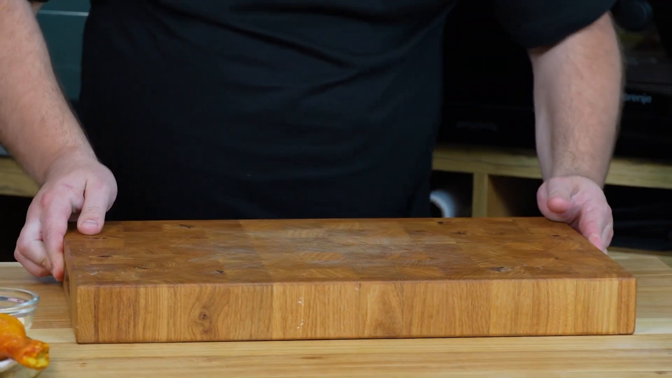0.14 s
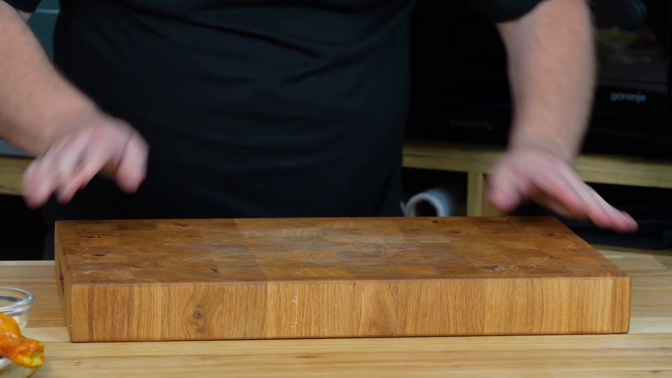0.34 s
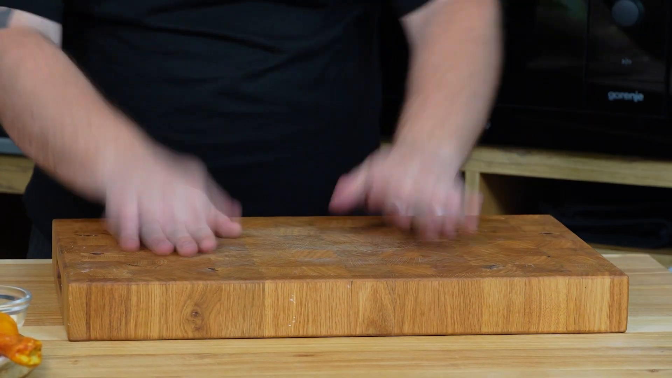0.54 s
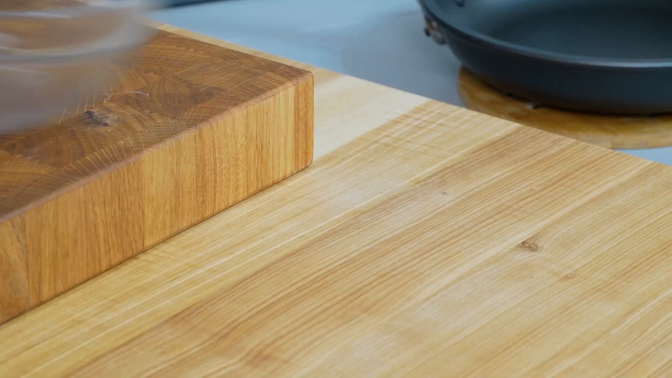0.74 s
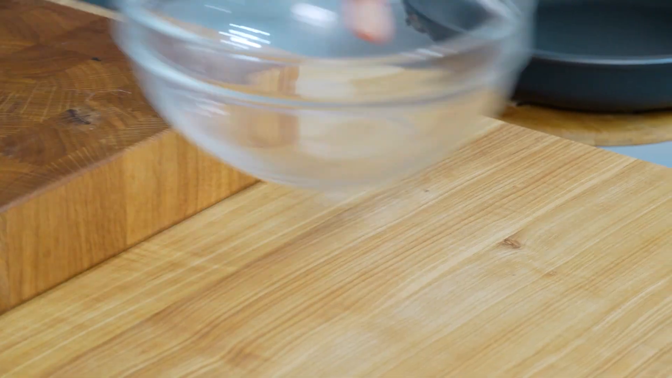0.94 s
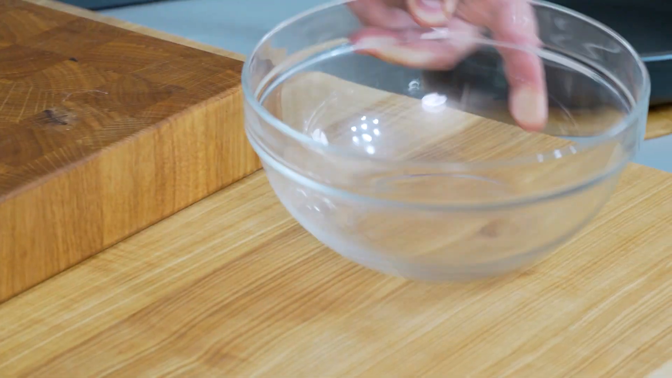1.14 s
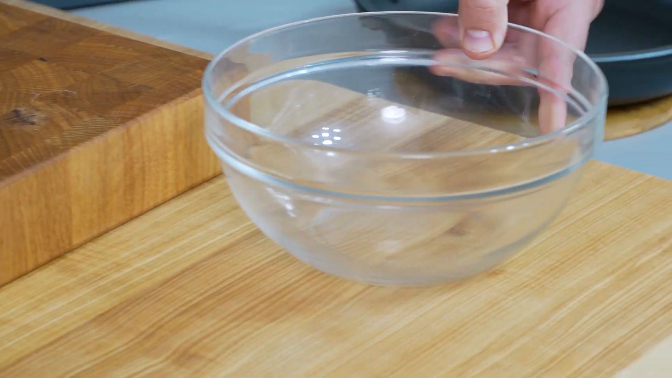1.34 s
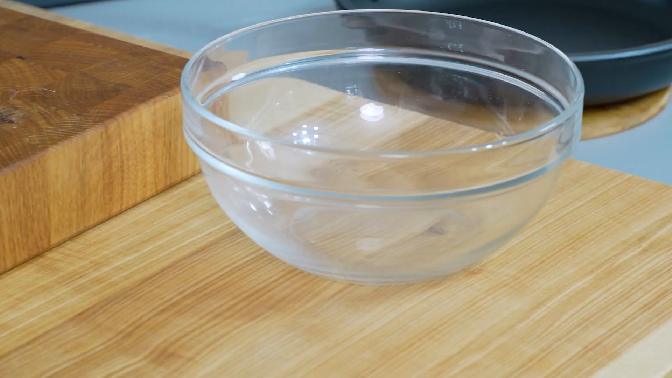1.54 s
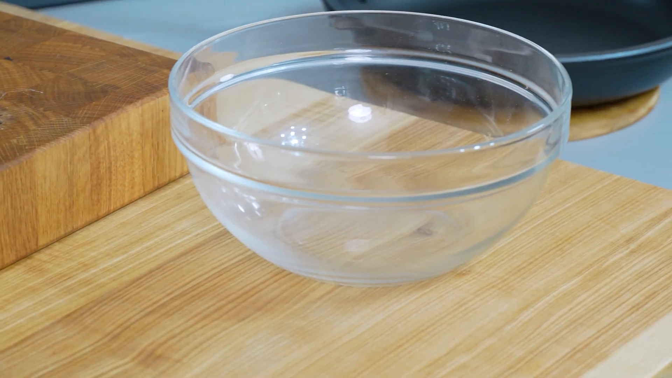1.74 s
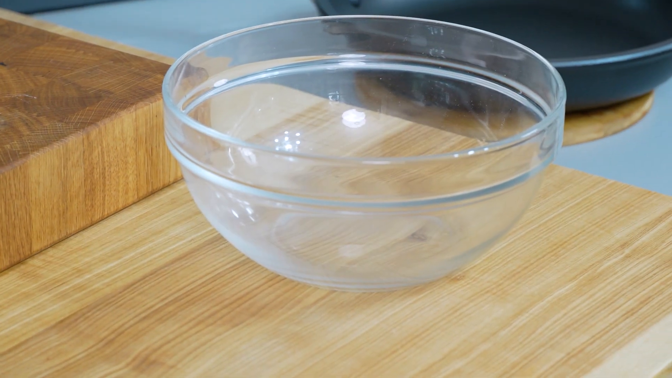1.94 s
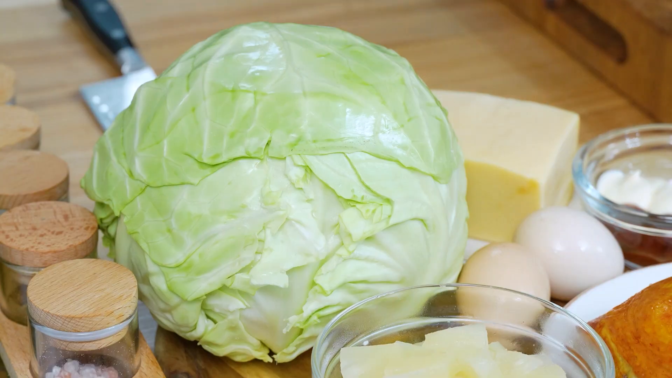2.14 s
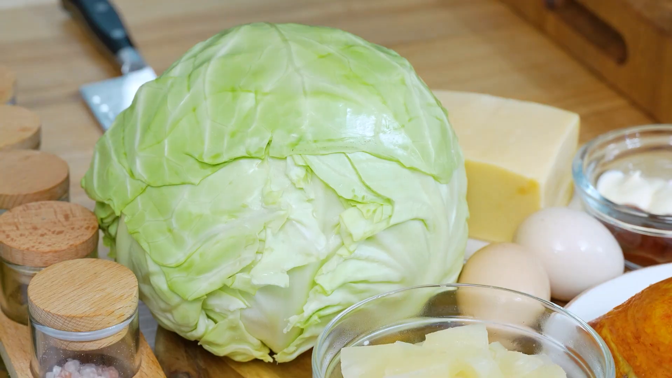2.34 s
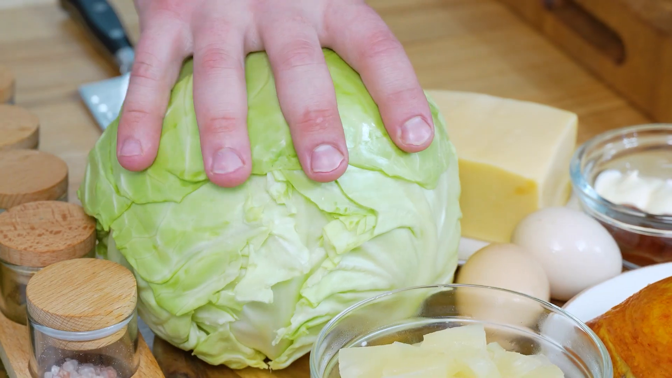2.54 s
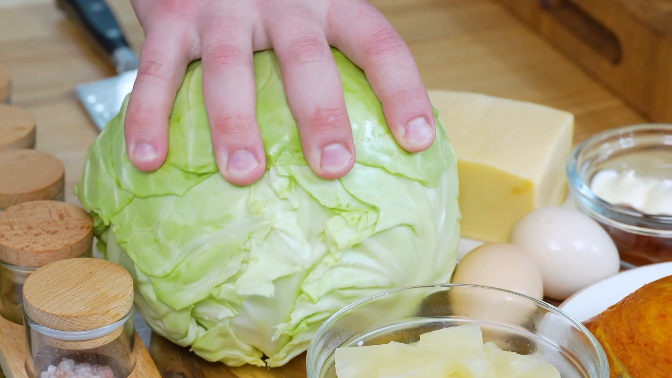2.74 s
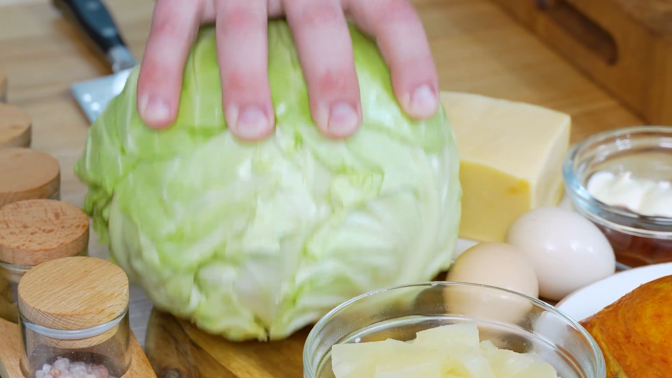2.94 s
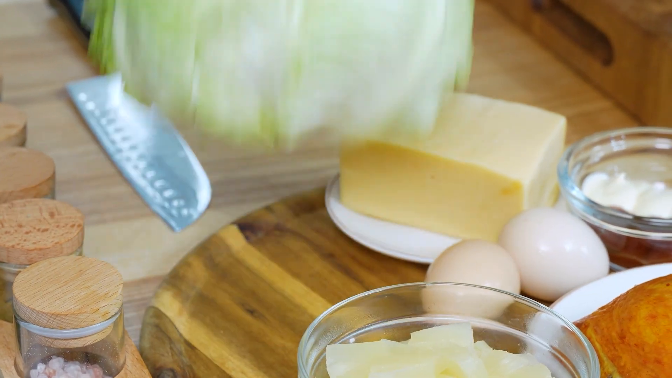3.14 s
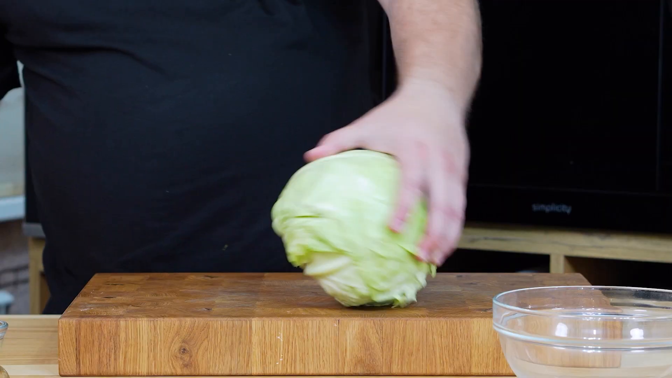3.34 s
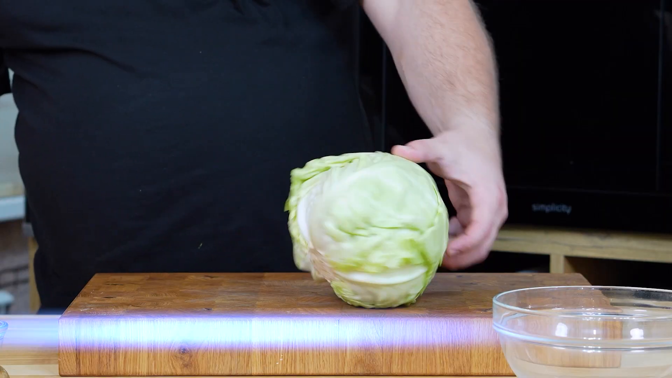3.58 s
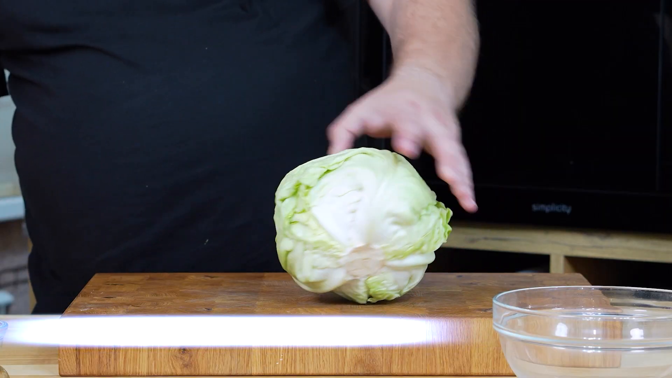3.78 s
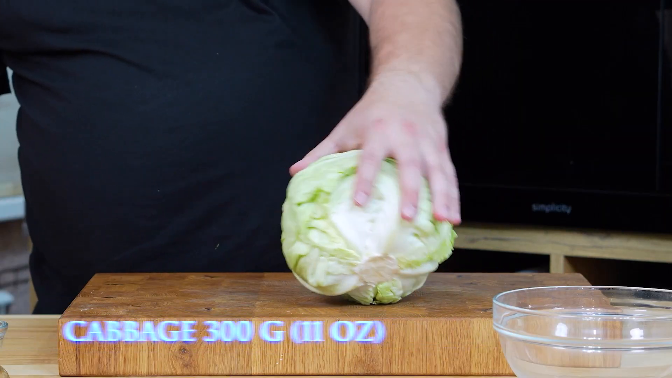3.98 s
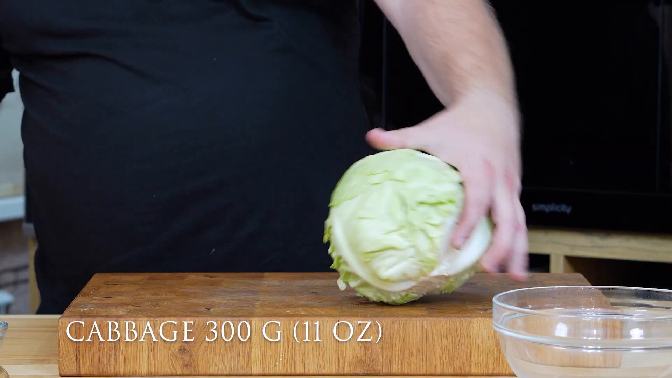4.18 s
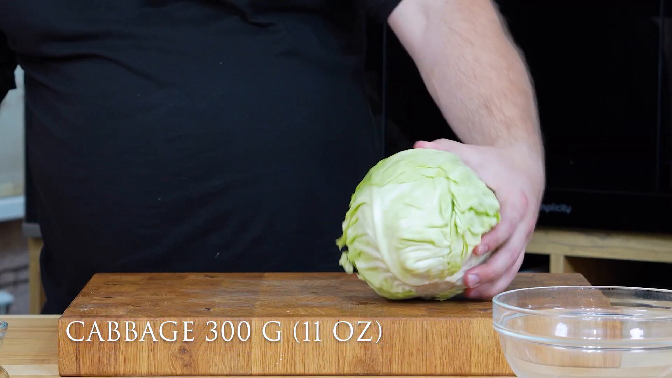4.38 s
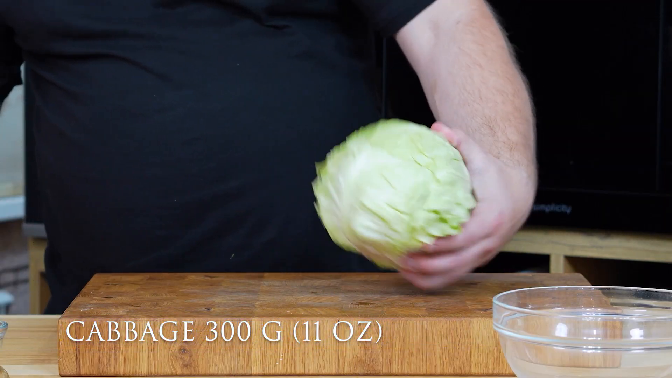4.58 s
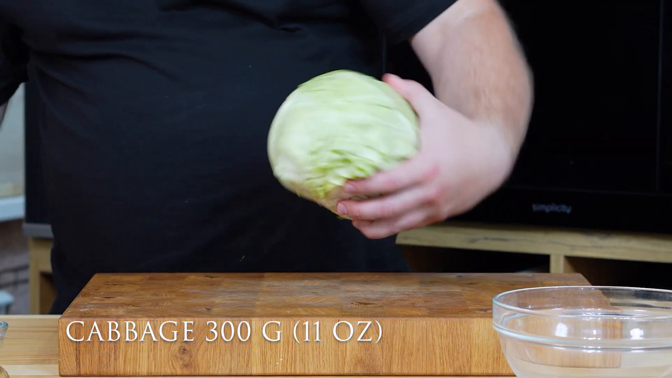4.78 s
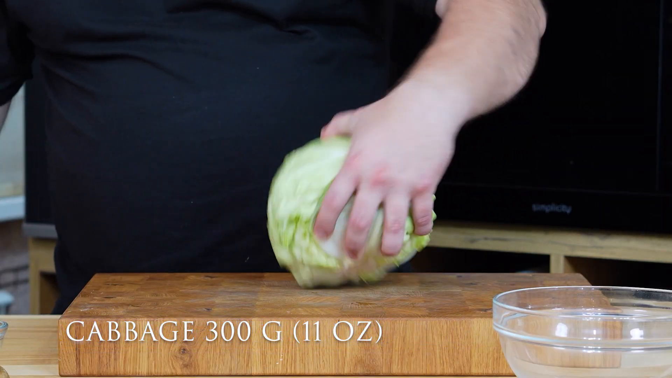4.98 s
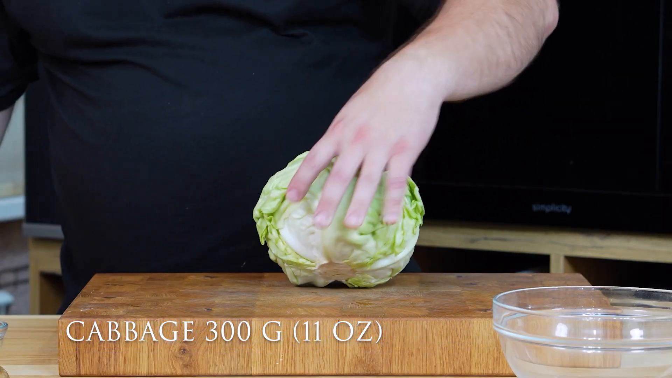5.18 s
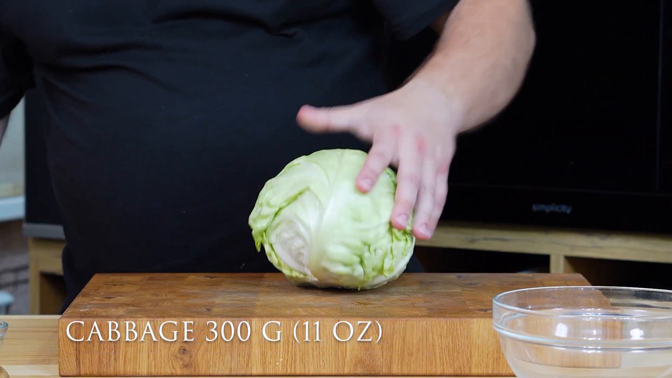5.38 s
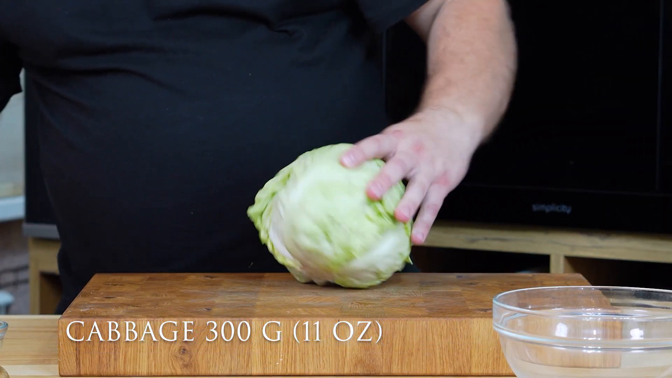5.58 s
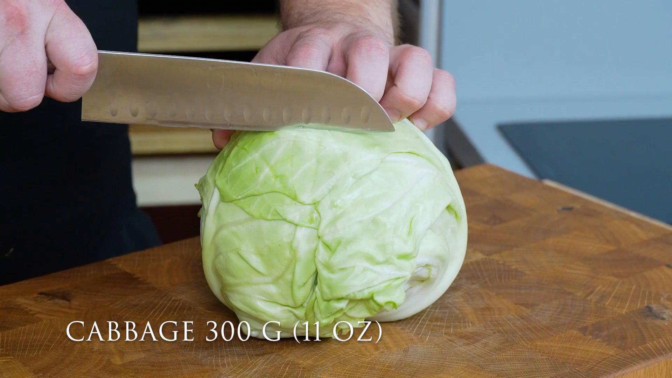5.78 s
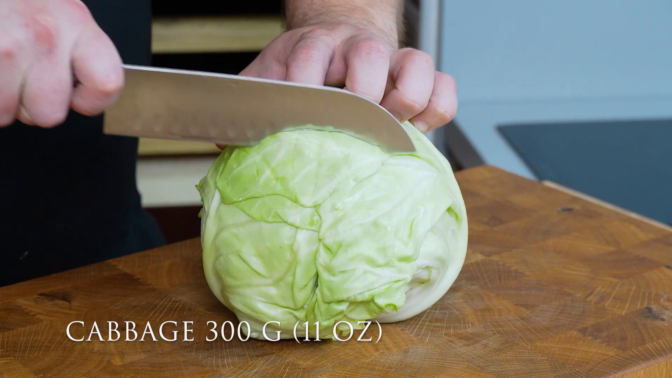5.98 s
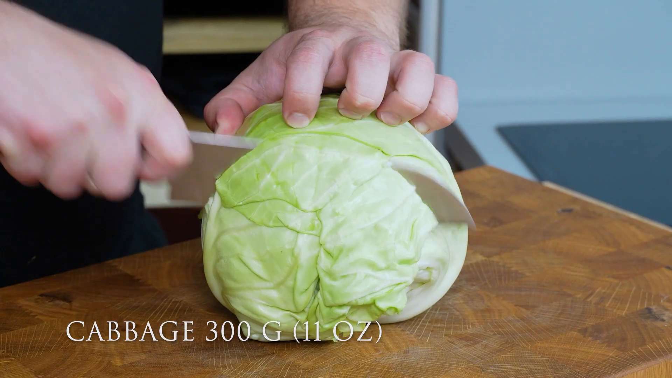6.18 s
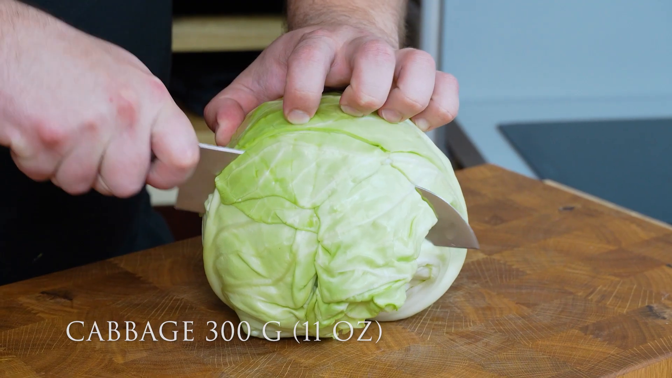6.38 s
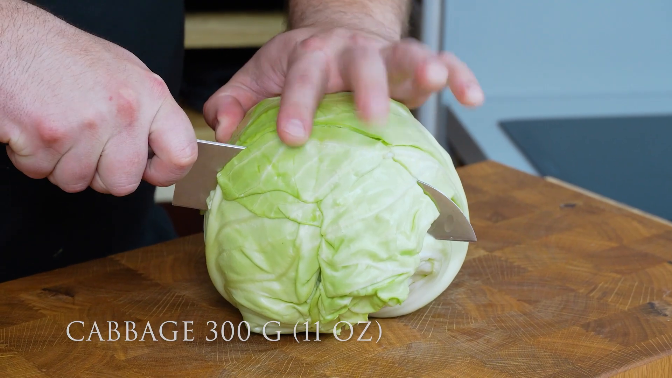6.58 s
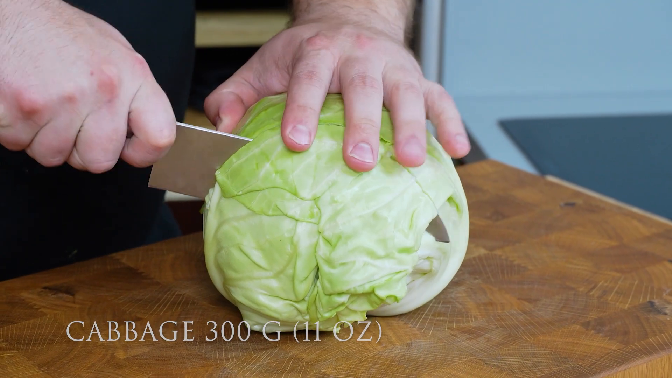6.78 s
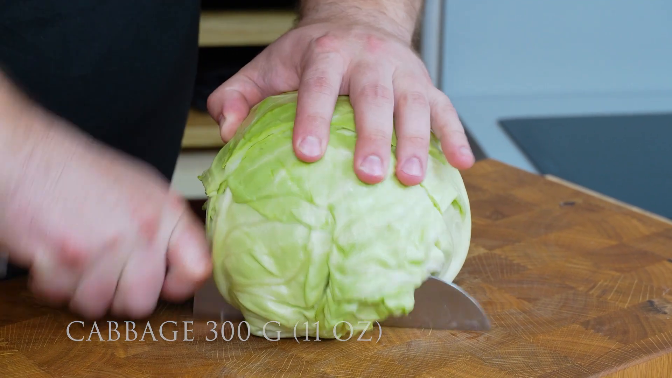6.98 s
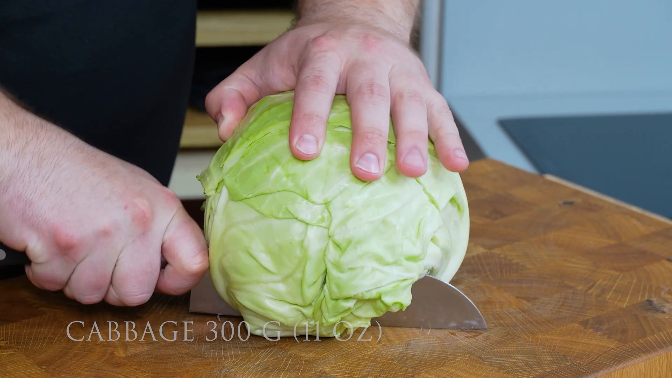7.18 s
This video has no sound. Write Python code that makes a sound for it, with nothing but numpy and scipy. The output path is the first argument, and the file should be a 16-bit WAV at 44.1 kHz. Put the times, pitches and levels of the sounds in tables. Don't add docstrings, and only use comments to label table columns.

```python
import sys
import numpy as np
from scipy import signal
from scipy.fft import rfft, irfft, next_fast_len
from scipy.io import wavfile
from scipy.ndimage import uniform_filter1d

SR = 44100
rng = np.random.default_rng(int(sys.argv[2]) if len(sys.argv) > 2 else 0)


def transcribe(signal):
    frames = np.atleast_2d(signal).T
    limited = np.clip(frames, -1, 1)
    pcm = np.round(limited * 32767).astype(np.int16)
    wavfile.write(sys.argv[1], SR, pcm)


def gain_from_db(level_db):
    decades = np.asarray(level_db, float) / 20
    return 10 ** decades


N = 318843

# t/s, peak level/dB, tilt towards the upper modes/(dB per octave)
JOLTS = [(0.144, -28, -6), (0.618, -25, 18), (0.868, -59, -4), (1.219, -45.5, 0), (1.678, -58.5, 2.5),
         (2.509, -32.5, -5), (2.539, -40.5, -14), (3.361, -72, -14), (3.635, -48.5, -17), (3.931, -64, -10),
         (5.085, -25, -4), (5.501, -58, -2), (6.282, -53, -5), (6.643, -56.5, 16.5), (7.007, -45, 7)]
# t/s, peak level/dB, f/Hz
THUDS = [(0.045, -39.5, 164), (1.549, -40, 310), (1.681, -49.5, 225.6), (3.399, -36, 337),
         (3.403, -43.5, 460), (3.641, -52, 158), (3.93, -56.5, 177), (4.518, -54.5, 164),
         (5.081, -39.5, 565), (5.506, -46, 540), (6.399, -49.5, 697), (7.014, -28, 282), (7.089, -36, 170)]
# f/Hz, level/(dB per Hz)
KNOCK_COLOUR = [(60, -53), (150, -15), (230, -17.5), (430, -12.5), (620, -8.5), (760, 5), (880, 4.5),
                (1000, 2), (1150, -5.5), (1500, -11.5), (2300, -31.5), (3400, -37.5), (5000, -45),
                (8500, -53.5), (16000, -74)]
# f/Hz, level/(dB per Hz)
LEAF_COLOUR = [(290, -54), (500, -7.5), (630, -10), (878, -0.5), (986, -8), (1590, -7.5), (2210, -11.5),
               (3570, -7.5), (7560, -22), (12000, -31.5), (15800, -33.5)]


def unit(x):
    return x / np.sqrt(np.mean(x ** 2) + 1e-20)


def along(points, hz):
    f, v = np.transpose(points)
    return np.interp(np.log(hz + 1), np.log(f + 1), v)


def coloured(x, spectrum):
    m = next_fast_len(len(x) + 8192)
    magnitude = gain_from_db(along(spectrum, np.fft.rfftfreq(m, 1 / SR)))
    cepstrum = irfft(np.log(magnitude + 1e-6), m)
    cepstrum[1:m // 2] *= 2
    cepstrum[m // 2 + 1:] = 0
    return irfft(rfft(x, m) * np.exp(rfft(cepstrum)), m)[:len(x)]


def noise(spectrum):
    return unit(coloured(rng.standard_normal(N), spectrum))


def add(track, s, x):
    part = track[round(s * SR):][:len(x)]
    part += x[:len(part)]


def ring(modes, scatter_db, attack):
    t = np.arange(SR) / SR
    hz, db, t60 = np.transpose(modes)[:, :, None]
    db = db + scatter_db * rng.standard_normal(hz.shape)
    sines = gain_from_db(db - 60 * t / t60) * np.sin(2 * np.pi * hz * t)
    return np.sum(sines, axis=0) * (1 - np.exp(-t / attack))


def swell(rows, extra_db=0):
    power, t = np.zeros(N), np.arange(N) / SR
    for (s, db, rise, fall), more_db in zip(rows, extra_db + np.zeros(len(rows))):
        span = slice(max(0, int((s - 3 * rise) * SR)), int((s + 3 * fall) * SR))
        u = t[span] - s
        drop_db = 20 * np.maximum(u / fall, -u / rise)
        power[span] += gain_from_db(2 * (db + more_db - drop_db))
    return np.sqrt(power)


def contacts(rows, colour, rise, fall, gain_db, room_db):
    out, send, t = np.zeros(N), np.zeros(N), np.arange(SR // 8) / SR
    blow = coloured(np.eye(1, len(t))[0], colour)
    for s, db in rows:
        collisions = rng.standard_normal(len(t)) * (1 - np.exp(-t / rise)) * np.exp(-t / fall)
        burst = coloured(collisions, colour)
        burst *= gain_from_db(db + gain_db) / np.abs(burst).max()
        add(out, s, burst)
        add(send, s + rise, gain_from_db(room_db) * blow * np.linalg.norm(burst) / np.linalg.norm(blow))
    return np.array([out, send])


def friction(rows, colour, per_s, spread_db, gain_db, press_db, clump_db):
    chance, luck = rng.random((2, N))
    size = (chance < per_s / SR) * gain_from_db(spread_db * np.minimum(-np.log(1 - luck), 2.6))
    z = signal.stft(rng.standard_normal(N) * (0.17 + size), nperseg=256)[2]
    patches = uniform_filter1d(uniform_filter1d(rng.standard_normal(z.shape), 14, 0), 3, 1)
    patchy = signal.istft(z * gain_from_db(clump_db * unit(patches)), nperseg=256)[1][:N]
    grains = unit(coloured(patchy, colour))
    grains = signal.sosfilt(signal.butter(3, 280, "high", fs=SR, output="sos"), grains)
    dull = signal.sosfiltfilt(signal.butter(3, 6000, fs=SR, output="sos"), grains)
    bright = unit(grains - dull)
    *shape, bright_db = np.transpose(rows)
    shape = np.transpose(shape)
    sound = swell(shape) * dull + swell(shape * [1, 1, 1, 0.65], bright_db) * bright
    return gain_from_db(gain_db) * np.array([sound, gain_from_db(press_db) * swell(shape)])


def room_hush():
    # f/Hz, level/(dB per Hz)
    hush_colour = [(53, -35.5), (90, -0.5), (253, -2.5), (453, 2.5), (586, -5), (639, -6), (1070, -3),
                   (1840, -17.5), (2140, -19.5), (4400, -18), (5390, -11), (6010, -22.5), (12200, -51.5),
                   (15500, -47)]
    return gain_from_db(-73) * noise(hush_colour)


def table_thumps():
    # f/Hz, level/dB, t60/s
    table_modes = [(35.3, -9.5, 0.72), (47.6, 1, 0.55), (65.62, 4, 0.71), (78.3, -4, 0.5), (88, -9, .3)]
    # peak t/s, level/dB, rise/s, fall/s
    sway = [(.01, -48, .1, 0.08), (.3, -42.5, 0.054, 0.47), (.8, -47.5, 0.5, .9), (2.25, -66, 0.4, 0.52),
            (2.72, -52.5, 0.23, 0.78), (3.38, -50.5, 0.076, 0.11), (3.81, -64, .1, 0.13),
            (4.05, -51, 0.43, 0.49), (4.6, -64, 1, 0.48), (5.25, -45, 0.19, 0.13),
            (5.44, -45.5, 0.12, 0.39), (5.74, -54.5, 0.58, 0.17), (6.65, -56, 1, 0.96),
            (7.22, -41.5, 0.34, 0.093)]
    # f/Hz, level/(dB per Hz)
    sway_colour = [(15, -28), (35, 2.5), (60, 1.5), (85, -12), (130, -49)]
    out = np.zeros(N)
    for s, db, tilt_db in JOLTS:
        modes = [(hz, level + tilt_db * np.log2(hz / table_modes[2][0]), t60) for hz, level, t60 in table_modes]
        add(out, s, gain_from_db(db - 3.5) * ring(modes, scatter_db=2.5, attack=.008))
    return out + gain_from_db(-6.5) * (swell(sway) + gain_from_db(-75.5)) * noise(sway_colour)


def board_slide():
    slides = [
        (.066, -36, 0.13, 0.027, -39.5),
        (.138, -32.5, 0.053, .01, -24),
        (.51, -58, 0.043, .3, -10),
        (.575, -63.5, .1, .05, -5.5),
        (.602, -43.5, 0.017, 0.016, -21),
    ]
    # f/Hz, level/(dB per Hz)
    slide_colour = [(180, -25), (300, 0), (404, -27.5), (685, -4.5), (769, -12), (1050, -1.5), (1440, -11),
                    (1940, -12), (3630, -21), (4000, -30), (15500, -67)]
    return friction(slides, slide_colour, per_s=4800, spread_db=-1.0, gain_db=-12, press_db=-14.5, clump_db=3.5)


def thuds():
    out, t = np.zeros(N), np.arange(SR // 8) / SR
    for s, db, hz in THUDS:
        push = t * hz * np.exp(1 - t * hz / 1.13)
        add(out, s, gain_from_db(db - 8.0) * np.sin(2 * np.pi * hz * t) * push)
    return out


def wood_rumble(pressure):
    # f/Hz, level/(dB per Hz)
    wood_colour = [(60, -44), (120, 5), (200, 1.5), (450, -2), (900, -30.5), (2000, -55)]
    rise_s, fall_s = 0.033, 0.06
    rows = [(s, db - 12, rise_s, fall_s) for s, db, _ in THUDS]
    rows += [(s, db - 27, rise_s, fall_s) for s, db, _ in JOLTS]
    return (swell(rows) + pressure) * noise(wood_colour)


def leaf_snaps():
    # t/s, peak level/dB, f/Hz, crumble/ms
    leaf_breaks = [(0.112, -40.5, 2560, 3), (0.3396, -56.5, 2170, 3), (2.1171, -60, 2150, 2.7),
                   (2.5537, -40, 1940, 2.3), (2.6375, -38, 4630, 6.6), (2.655, -40, 5870, 3),
                   (2.7869, -47, 4800, 5), (2.8663, -35.5, 5100, 11), (2.9294, -34.5, 3380, 4),
                   (2.9467, -38, 3500, 3), (2.965, -34, 3800, 3.2), (3.209, -52, 2850, 1.6),
                   (3.3294, -54, 4550, 2.7), (3.6177, -38.5, 6700, 3.4), (3.68, -47, 10000, 2),
                   (3.738, -45.5, 10000, 4.9), (4.0855, -53.5, 2880, 3), (4.1006, -51, 12500, 2),
                   (4.14, -57.5, 8720, 6), (4.2064, -43.5, 10600, 4), (4.2356, -46, 6500, 4),
                   (4.2987, -47.5, 4300, 6.5), (4.3695, -38.5, 2940, 7.4), (4.4015, -35, 3770, 4.7),
                   (4.478, -49, 3190, 3), (4.541, -50, 5600, 2.7), (4.688, -63, 2000, 1.8),
                   (5.02, -59, 6300, 2), (5.471, -47, 4500, 5), (5.5648, -37.5, 2860, 5.1),
                   (5.632, -35.5, 2780, 4.5), (5.751, -41, 4220, 2.3), (5.8272, -39.5, 4870, 2.2),
                   (5.9008, -46, 3460, 2.6), (5.9335, -46, 2200, 4), (5.9984, -40, 3750, 4),
                   (6.0194, -35.5, 4700, 5.5), (6.1967, -35, 1660, 4.7), (6.2498, -28, 3920, 4.3),
                   (6.278, -31, 3900, 2.9), (6.4001, -35.5, 1440, 4.9), (6.8487, -48, 2000, 3),
                   (6.9113, -48, 2500, 2.4), (6.9377, -33.5, 3050, 3), (6.9705, -23, 1800, 3.8),
                   (6.9888, -17, 3430, 5.8), (7.048, -18.5, 4800, 3.9)]
    snap_shape = [(.2, -31.5), (.6, -4.5), (1, 5), (1.6, -13), (5, -29.5)]
    out, t = np.zeros(N), np.arange(2000) / SR
    for s, db, hz, ms in leaf_breaks:
        crumbs = rng.standard_normal(len(t)) * np.exp(-1000 * t / ms)
        crack = coloured(crumbs, np.multiply(snap_shape, [hz, 1]))
        add(out, s, gain_from_db(db - 3.5) * crack / np.abs(crack).max())
    return out


def board_set_down():
    # t/s, peak level/dB
    board_hits = [
        (0.146, -17),
    ]
    # f/Hz, level/(dB per Hz)
    board_colour = [(59, -45.5), (100, -23.5), (159, -4.5), (420, -29.5), (497, -17), (682, -17.5),
                    (1020, -15), (1180, -24.5), (1400, -24.5), (2930, -47.5), (15500, -84.5)]
    return contacts(board_hits, board_colour, rise=0.00041, fall=0.011, gain_db=-3.5, room_db=0.0)


def board_slap():
    # t/s, peak level/dB
    slap_hits = [
        (0.614, -28.5),
        (0.617, -11),
        (.6215, -6.5),
    ]
    # f/Hz, level/(dB per Hz)
    slap_colour = [(59, -40), (100, -16), (177, -4), (276, -5.5), (314, -10.5), (814, -4.5), (1670, -9.5),
                   (1820, -11), (2070, -5), (3510, -5.5), (4620, -13.5), (5360, -16), (9500, -28.5),
                   (13500, -29.5), (15800, -34)]
    return contacts(slap_hits, slap_colour, rise=0.0012, fall=0.0022, gain_db=1.0, room_db=1.5)


def leaf_handling():
    handling = [(.728, -41, 0.081, 0.36, -5), (1.674, -62.5, 0.051, .17, -23),
                (2.56, -43.5, 0.04, 0.2, -19), (2.952, -32.5, 0.056, 0.055, -14),
                (3.02, -57, 0.062, 0.33, -6.5), (3.33, -42, 0.0086, 0.2, -12),
                (3.42, -51.5, 0.066, 0.035, -36), (3.615, -47.5, 0.11, 0.65, -5),
                (3.82, -86, 0.13, 0.26, -14), (3.93, -55, 0.092, 0.16, -23.5),
                (4.02, -65, 0.02, 0.075, -13), (5.07, -62, 0.083, 0.011, -18), (5.28, -55, 0.8, .25, -15)]
    return friction(handling, LEAF_COLOUR, per_s=900, spread_db=2.0, gain_db=-10.0, press_db=-24.5, clump_db=4.0)


def bowl():
    # t/s, peak level/dB, glass ring/dB, mode tilt/(dB per octave)
    touches = [(.8615, -6, -30.5, 12.5), (1.2285, -9, -40.5, -13.5), (1.2465, -11.5, -38.5, -3),
               (1.2625, -12.5, -39.5, -15), (1.278, -15, -43.5, -2.5), (1.3065, -18.5, -32.5, 4),
               (1.3158, -9.5, -44, -3), (1.321, -14.5, -47.5, 0), (1.3325, -8, -47, 0),
               (1.341, -15, -44, 2), (1.3525, -12.5, -46.5, 2), (1.3605, -13, -46.5, 2.5),
               (1.371, -16, -47, -6), (1.385, -14.5, -49, 0.5), (1.4, -18, -49, 0.5),
               (1.411, -27, -50, 3.5), (1.455, -21, -51, -4)]
    landings = [
        (1.2030, -1, -47, -12),
        (1.2890, -1.6, -48, -4),
    ]
    # f/Hz, level/(dB per Hz)
    touch_colour = [(59, -67), (100, -40), (161, -11), (431, -22.5), (682, -2), (1100, -11.5), (1190, -10),
                    (1770, -15), (2990, -32), (3860, -28), (4130, -37), (5800, -41), (7540, -79.5),
                    (12800, -120)]
    glass_hz = [549, 3345, 3865, 6191, 6222, 8527, 9383, 10400, 10870, 12340, 14270]
    # level/dB, t60/s
    glass_modes = [(0, 0.87), (5.5, 0.075), (3, 0.18), (0, .18), (-5.5, .17), (-13.5, 0.034), (-13, .07),
                   (-22, .05), (-22, .06), (-22, .08), (-30.5, .07)]
    # f/Hz, level/dB, t60/s
    rim_low = (549, -14, .7)
    knocks, send, glass = np.zeros((3, N))
    push = np.pad(np.hanning(7), (0, 4096))
    for k, (s, db, ring_db, tilt_db) in enumerate(touches + landings):
        knock = coloured(push, KNOCK_COLOUR if k else touch_colour)
        knock = gain_from_db(db) * knock / np.abs(knock).max()
        heel_db = -2 if k >= len(touches) else -9
        add(knocks, s, knock)
        add(knocks, s + .0047, gain_from_db(heel_db) * knock)
        add(send, s, gain_from_db(4.5 if k else 8) * knock)
        modes = [(glass_hz[0], *glass_modes[0]) if k else rim_low]
        for hz, (level, t60) in zip(glass_hz[1:], glass_modes[1:]):
            tilt = tilt_db * np.log2(np.clip(hz / 5000, .65, 1.25))
            modes.append((hz, level + tilt, t60))
        add(glass, s, gain_from_db(db + ring_db) * ring(modes, scatter_db=2, attack=.002))
    return np.array([knocks, send]), glass


def skin_rustle():
    rustles = [(1.85, -79, .25, 0.42, 6.5), (2.09, -71, 0.22, .08, 0.5), (2.78, -61.5, 0.32, 0.15, -4),
               (2.868, -38, 0.0081, 0.029, -11), (2.968, -39, 0.02, 0.069, -12),
               (4.11, -49, 0.042, 0.33, -10), (4.21, -61, .03, 0.079, 1), (4.31, -50.5, 0.021, 0.16, -11),
               (4.39, -43.5, 0.085, 0.078, -15), (4.508, -61.5, 0.05, 0.049, -10),
               (5.49, -47.5, 0.16, 0.18, -17), (5.57, -46.5, 0.036, 0.077, -11),
               (5.64, -44.5, 0.08, 0.19, -9.5), (5.75, -54, 0.027, 0.044, 2),
               (5.83, -70, 0.0052, 0.073, -14), (6.905, -57, .004, 0.19, -14)]
    # f/Hz, level/(dB per Hz)
    skin_colour = [(170, -38), (290, -25), (504, -9.5), (1600, -6.5), (3570, -1), (7830, -12.5),
                   (11300, -19), (15800, -35)]
    return friction(rustles, skin_colour, per_s=916, spread_db=3.5, gain_db=-11.0, press_db=-25.0, clump_db=4.0)


def fingertip_taps():
    # t/s, peak level/dB
    tap_hits = [
        (2.494, -29.5),
        (2.499, -30),
        (3.357, -26),
    ]
    return contacts(tap_hits, LEAF_COLOUR, rise=0.00037, fall=0.0063, gain_db=0.15, room_db=-0.5)


def cabbage_pats():
    # t/s, peak level/dB
    pat_hits = [
        (2.506, -20),
        (2.524, -24.5),
    ]
    # f/Hz, level/(dB per Hz)
    pat_colour = [(59, -55), (100, 6.5), (238, -7), (965, 0), (1100, 3.5), (1240, -7.5), (1500, 0.5),
                  (2110, -12), (3510, -15.5), (4160, -40), (5250, -13), (7530, -43), (15800, -56)]
    return contacts(pat_hits, pat_colour, rise=0.00079, fall=0.0041, gain_db=1.0, room_db=-1)


def cabbage_drop():
    # t/s, peak level/dB
    drop_hits = [
        (5.079, -20),
    ]
    # f/Hz, level/(dB per Hz)
    drop_colour = [(59, -9.5), (100, -1), (146, -15.5), (189, -7), (356, -30.5), (832, -20.5), (985, -27),
                   (1170, -19.5), (2250, -30.5), (2610, -26), (2900, -23), (9500, -49), (13500, -53),
                   (15800, -61)]
    return contacts(drop_hits, drop_colour, rise=0.0019, fall=0.008, gain_db=-1.0, room_db=2.0)


def knife_cut():
    cuts = [
        (5.96, -45, 0.092, 0.91, -11.5),
        (6.12, -39.5, 0.26, 0.18, -12.5),
        (6.245, -27, 0.19, 0.093, -15),
        (6.28, -44, 0.056, 0.074, -3),
        (6.4, -44.5, 0.073, 0.11, -14),
        (6.8, -61, 0.17, 0.089, -32),
        (6.945, -26.5, 0.014, 0.24, -15.5),
        (7.02, -15, 0.075, 0.043, -16),
        (7.05, -31.5, .03, 0.18, -10.5),
    ]
    # f/Hz, level/(dB per Hz)
    cut_colour = [(180, -13), (300, -23.5), (398, -21), (545, -5.5), (602, -9.5), (867, 0.5), (974, -8),
                  (1710, -9), (2350, -13), (3670, -10), (12100, -22.5), (15800, -28)]
    return friction(cuts, cut_colour, per_s=1400, spread_db=0.5, gain_db=-11.5, press_db=-25.5, clump_db=2.0)


def board_creak():
    creaks = [
        (5.94, -51, 0.02, 0.27, -47),
        (6.07, -44, 0.05, 0.036, -42),
        (6.14, -45, 0.018, 0.39, -43),
    ]
    return friction(creaks, KNOCK_COLOUR, per_s=610, spread_db=-1.0, gain_db=-9.0, press_db=-42, clump_db=0.5)


def knife_chop():
    # t/s, peak level/dB
    chop_hits = [
        (7.0105, -12),
        (7.0133, -13.5),
        (7.017, -12),
    ]
    # f/Hz, level/(dB per Hz)
    chop_colour = [(59, -59), (100, -22), (295, 0), (490, -22.5), (849, -3), (1350, -15), (1670, -7.5),
                   (3030, -8.5), (3440, -4), (8370, -33.5), (13600, -26.5), (15800, -32)]
    return contacts(chop_hits, chop_colour, rise=0.000092, fall=0.0015, gain_db=1.56, room_db=-2.5)


def kitchen(x, send):
    # t/s, level/dB
    walls = [(.0047, -18), (0.0125, -14.5), (.017, -19.5)]
    # f/Hz, t60/s
    decay = [(100, 0.53), (400, 0.54), (1000, 0.38), (3000, 0.39), (8000, 0.26), (15000, 0.4)]
    out, step = x.copy(), 8192
    for s, db in walls:
        add(out, s, gain_from_db(db) * x)
    for start in range(0, N, step):
        hz, t, z = signal.stft(rng.standard_normal(3 * step), SR, nperseg=256)
        tail = signal.istft(z * gain_from_db(-60 * t / along(decay, hz)[:, None]), SR, nperseg=256)[1]
        tail *= 1 - np.exp(-np.arange(len(tail)) / SR / 0.0053)
        tail /= np.linalg.norm(tail)
        add(out, start / SR + .006, signal.fftconvolve(send[start:start + step], tail))
    return out


def scene():
    blows, glass = bowl()
    blows += board_set_down() + board_slap() + fingertip_taps() + cabbage_pats() + cabbage_drop() + knife_chop()
    strokes, pressure = (board_slide() + leaf_handling() + skin_rustle() + knife_cut() + board_creak())
    parts = np.array([strokes + wood_rumble(pressure), glass, leaf_snaps(), thuds()])
    room_db = np.array([0, 3, -1, 4])
    heard = kitchen(blows[0] + parts.sum(axis=0), blows[1] + gain_from_db(room_db) @ parts)
    return (heard + table_thumps() + room_hush())[None]


def band_limit(x):
    return signal.sosfilt(signal.butter(12, 16650, fs=SR, output="sos"), x)


def record(dry):
    rolled = signal.sosfilt(signal.butter(1, 30, "high", fs=SR, output="sos"), dry)
    clipped = np.clip(rolled, -.63, .63)
    band = signal.sosfiltfilt(signal.butter(12, 15600, fs=SR, output="sos"), clipped)
    return band_limit(band)


dry = scene()
out = record(dry)
transcribe(out)
```